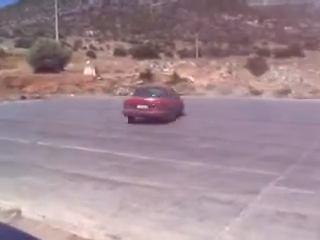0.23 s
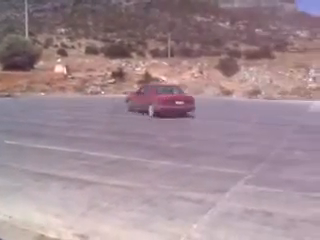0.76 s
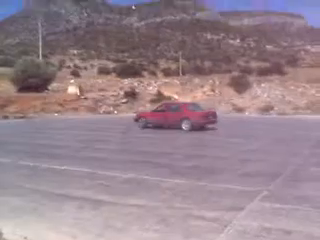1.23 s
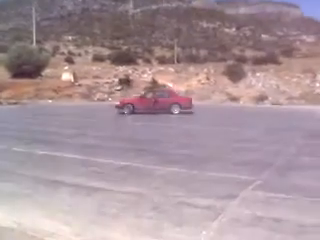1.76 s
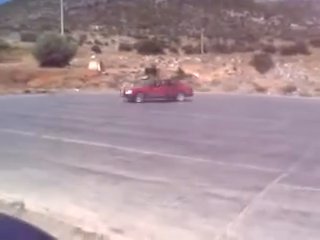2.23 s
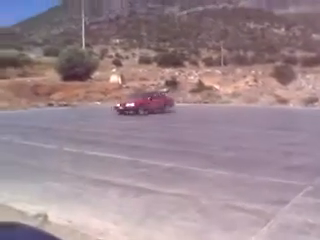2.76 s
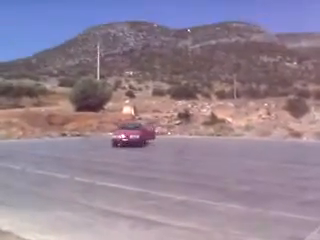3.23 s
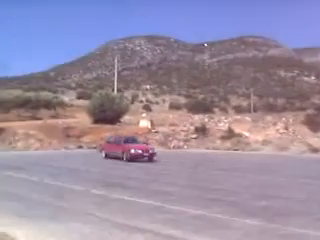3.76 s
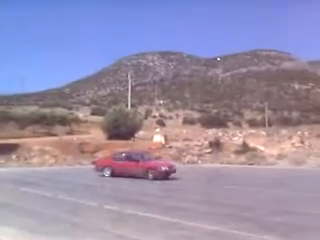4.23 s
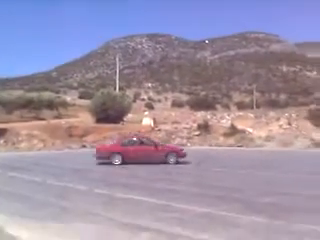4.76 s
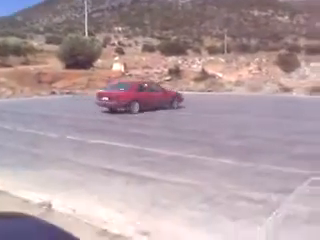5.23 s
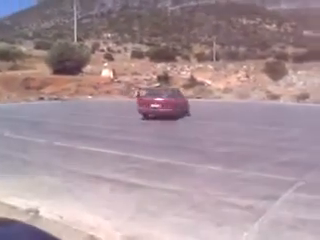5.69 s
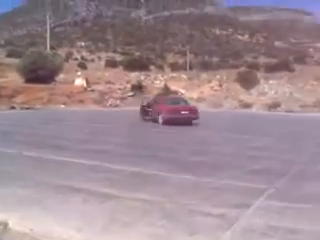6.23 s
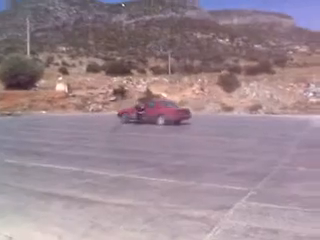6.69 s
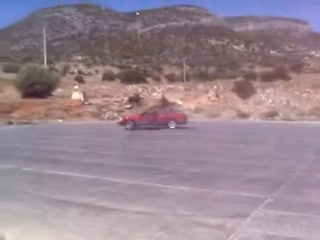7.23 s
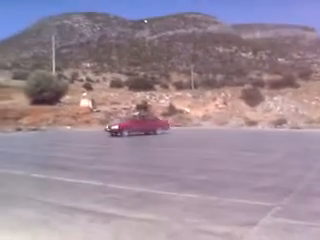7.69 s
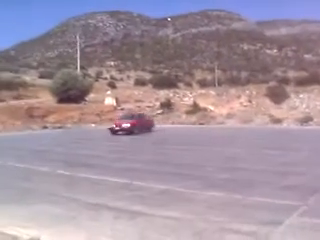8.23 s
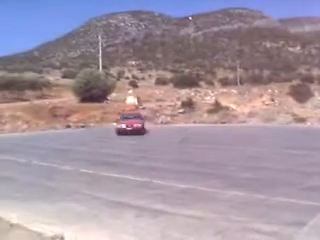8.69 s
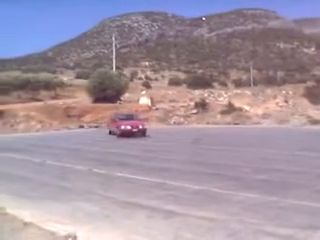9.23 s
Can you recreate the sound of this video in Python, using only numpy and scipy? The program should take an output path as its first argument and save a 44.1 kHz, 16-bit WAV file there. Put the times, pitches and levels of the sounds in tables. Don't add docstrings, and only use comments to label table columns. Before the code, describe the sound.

Stuttering mid-pitched tyre squeals from a circling car, faint low engine drone behind, with rough wind thumps overloading a muffled small camera microphone.

```python
import sys
import numpy as np
from scipy import signal
from scipy.fft import rfft, irfft, next_fast_len
from scipy.io import wavfile
from scipy.ndimage import uniform_filter1d

SR = 44100
rng = np.random.default_rng(int(sys.argv[2]) if len(sys.argv) > 2 else 0)


def to_wav(s):
    ch = np.atleast_2d(s).T
    pcm = np.round(np.clip(ch, -1, 1) * 32767)
    wavfile.write(sys.argv[1], SR, pcm.astype(np.int16))


def magnitude_from_level(level_db):
    exponent = np.asarray(level_db, float) / 20
    return 10 ** exponent


N = 417186

# start_s, slip_pitch_hz, scrub_between_spells_db,
# wind_between_gusts_db, wind_sharpness_db
SLOW = [(0, 1398, -22, -40, 6), (0.8, 1396, -27, -26, -2), (1.27, 1372, -32.5, -33, 3.5),
        (1.45, 1371, -34.5, -26, 0), (2.2, 1346, -26.5, -27.5, -4), (3, 1383, -26, -26.5, 0),
        (3.6, 1374, -19.5, -27.5, -3), (4.2, 1433, -22.5, -32, 3), (5, 1500, -30.5, -27.5, 2.5),
        (5.7, 1587, -33.5, -28, 7), (6.4, 1580, -29, -28, 2), (7, 1521, -22, -26.5, -1),
        (7.7, 1341, -28, -39.5, -0.5), (8.2, 1370, -20, -28.5, 1.5), (8.9, 1428, -19.5, -23, 0.5),
        (9.46, 1387, -24, -25.5, 1)]


def evened(x):
    return x / np.sqrt(np.mean(x ** 2) + 1e-20)


def curve(rows, column):
    rows = np.array(rows)
    return np.interp(np.arange(N) / SR, rows[:, 0], rows[:, column])


def colour(x, points):
    size = next_fast_len(N)
    hz, db = np.transpose(points)
    bins_hz = np.fft.rfftfreq(size, 1 / SR)
    shape_db = np.interp(np.log(bins_hz + 1), np.log(hz + 1), db)
    return evened(irfft(rfft(x, size) * magnitude_from_level(shape_db), size)[:N])


def wander(hz):
    knots = rng.standard_normal(N // 20 + 2)
    smooth = signal.lfilter(*signal.butter(2, min(hz * 40 / SR, .99)), knots)
    return evened(np.interp(np.arange(N) / 20, np.arange(len(knots)), smooth))


def humps(rows, column, sharp):
    out = np.zeros(N)
    for row in rows:
        start, length = row[0] * SR, row[1] * SR / 1000
        at = np.arange(max(int(start - length), 0), min(int(start + 2 * length), N))
        from_middle = abs((at - start - length / 2) / (0.52 * length))
        out[at] += magnitude_from_level(row[column]) * np.exp(-from_middle ** sharp)
    return out


def slips():
    # first_s, last_s, period_s, scrub_level_db, overtone_level_db
    runs = [
        (0.023, 0.473, .147, -30, -31),
        (0.779, 1.076, 0.13, -37, -36.5),
        (1.514, 2.455, .158, -34.5, -30),
        (2.94, 3.283, 0.17, -25.5, -34),
        (4.772, 5.5, 0.16, -30.5, -36.5),
        (5.757, 7.02, .14, -27, -34),
    ]
    # start_s, length_ms, scrub_level_db, overtone_level_db
    singles = [(.239, 52, -36, -41.5), (.708, 36, -34.5, -33), (1.17, 76, -30.5, -30),
               (1.402, 46, -39.5, -30.5), (1.664, 88, -26, -30), (2.84, 54, -41, -33.5),
               (3.543, 36, -20.5, -33.5), (3.692, 62, -32.5, -63), (3.931, 60, -34.5, -42),
               (5.24, 85, -25.5, -31.5), (5.657, 60, -36, -36), (6.39, 34, -24.5, -33),
               (6.494, 62, -23.5, -29), (7.202, 29, -31.5, -35), (7.304, 140, -28.5, -34),
               (7.524, 110, -34.5, -37.5), (7.732, 64, -35, -36.5), (8.113, 140, -32.5, -31.5),
               (8.421, 150, -27.5, -41.5), (8.317, 49, -32, -52), (8.605, 100, -20, -35.5),
               (8.775, 180, -44.5, -39.5), (9.031, 36, -41, -39), (9.317, 56, -34.5, -31)]
    slip_share = 0.77
    hops = []
    for first, last, period, *levels_db in runs:
        for s in np.linspace(first, last, round((last - first) / period) + 1):
            hops.append((s, 1000 * slip_share * period, *levels_db))
    return np.vstack([np.array(hops), singles])


def rubber(hz, jitter):
    shaky_hz = hz * (1 + jitter * wander(147))
    return np.sqrt(2) * np.exp(2j * np.pi * np.cumsum(shaky_hz) / SR)


def scrub():
    wide = 1 + np.interp(np.arange(N) / SR, (5.5, 6.9), [0, .5])
    outer = [(curve(SLOW, 1) * ratio ** wide, db) for ratio, db in [(.92, -5), (1, 0), (1.07, -7)]]
    inner = [(1600, -13), (1760, -9)]  # hz, level_db
    out = np.zeros(N, complex)
    for hz, db in outer + inner:
        grip_db = 4.5 * wander(40)
        pitch_hz = hz * (1 + .03 * wide * wander(18))
        out += magnitude_from_level(db + grip_db) * rubber(pitch_hz, .021 * wide ** 2)
    level = humps(slips(), column=2, sharp=1.7) + magnitude_from_level(curve(SLOW, 2) - 7.0)
    return level * out / np.std(out.real)


def chirps():
    # middle_s, pitch_hz, level_db
    outer = [(.204, 1384, -25.5), (.229, 1310, -19.5), (.258, 1424, -16.5), (.383, 1324, -15),
             (.538, 1327, -17), (.731, 1358, -17.5), (2.211, 1302, -20), (2.533, 1266, -17.5),
             (2.559, 1338, -23.5), (3.228, 1373, -18), (3.365, 1392, -21.5), (3.462, 1216, -16),
             (3.476, 1298, -16), (3.574, 1419, -21.5), (3.687, 1314, -20.5), (3.744, 1271, -19.5),
             (3.82, 1424, -19), (3.977, 1486, -22), (4.051, 1518, -21.5), (5.96, 1546, -13.5),
             (6.046, 1683, -20), (6.09, 1626, -21.5), (6.113, 1611, -18), (7.758, 1293, -24),
             (8.188, 1356, -19.5), (8.275, 1300, -18), (8.487, 1298, -17), (8.511, 1360, -21),
             (8.555, 1292, -18), (9.173, 1398, -21.5)]
    # middle_s, pitch_hz, level_db
    inner = [(.271, 1797, -19), (0.291, 2110, -20), (.32, 1690, -18.5), (.408, 1690, -19),
             (.424, 1750, -16.5), (0.479, 1706, -26), (.51, 1700, -26), (.58, 1651, -19),
             (0.725, 1685, -21.5), (2.406, 1702, -24.5), (3.103, 2100, -25.5), (3.112, 1664, -17.5),
             (3.372, 1775, -23), (3.52, 1150, -23.5), (3.569, 1722, -18), (5.996, 2020, -27),
             (6.411, 1681, -27), (6.476, 1713, -25.5), (8.654, 1595, -21), (8.698, 1597, -25)]
    t, out = np.arange(N) / SR, np.zeros(N, complex)
    for block in range(3):
        middle, hz, db = np.transpose(sorted(outer + inner)[block::3])
        ms = 21 * magnitude_from_level(-.35 * (db + 20))
        start = middle - ms / 2000
        edges = np.ravel([start, start + ms / 1000], "F")
        pitch_hz = np.interp(t, edges, np.repeat(hz, 2)) * (1 + .015 * wander(30))
        rows = np.transpose([start, ms, hz, db])
        flutter = magnitude_from_level(2.1 + 2.2 * wander(120))
        out += humps(rows, column=3, sharp=4) * flutter * rubber(pitch_hz, .016)
    return out


def tyres():
    # hz, level_db
    reach = [(1900, -33), (2580, 0), (3300, -5), (4300, -28)]
    # start_s, pitch_hz, level_db
    paired = [(0, 682.4, -36), (.6, 688.7, -43), (1.9, 665, -42.5), (2.7, 654.6, -42), (3.2, 728, -42),
              (3.7, 723.4, -34), (4.4, 706, -49.5), (9.46, 710, -68.5)]
    squeal = chirps() + scrub()
    size = uniform_filter1d(abs(squeal), 500) + 1e-4
    squared = (squeal ** 2 * np.exp(.35j * wander(300))).real
    overtone = colour(squared / size ** 1.7, reach)
    overtone_level = humps(slips(), column=3, sharp=40) + magnitude_from_level(curve(SLOW, 2) - 20.5)
    half_hz = curve(paired, 1) * (1 + .008 * wander(3))
    half_rate = magnitude_from_level(curve(paired, 2) + 3 * wander(12)) * rubber(half_hz, .008)
    return squeal.real + overtone_level * overtone + half_rate.real


def engine():
    # start_s, firing_hz, level_db
    revs = [
        (0, 189, -43),
        (.8, 198.5, -28.5),
        (1.5, 187.8, -38.5),
        (5.5, 194, -42),
        (6.4, 204.8, -39),
        (7.3, 210.4, -35.5),
    ]
    # multiple_of_firing, level_db
    orders = [(1, -6), (2, -20)]
    firing_hz = curve(revs, 1) * (1 + .004 * wander(6.3) + .03 * wander(40))
    turn = 2 * np.pi * np.cumsum(firing_hz) / SR
    drone = sum(magnitude_from_level(db + 3 * wander(12)) * np.sin(k * turn) for k, db in orders)
    return np.sqrt(2) * magnitude_from_level(curve(revs, 2)) * drone


def rolling():
    # hz, level_db
    hiss = [(35, -69), (60, -39), (289, -7.5), (1050, -32), (1270, -10.5), (1390, -20.5), (1570, -10),
            (2190, 2.5), (2620, 1.5), (3000, -13.5), (4070, -20), (5290, -69.5), (8950, -120)]
    return magnitude_from_level(-43 + 4 * wander(13)) * colour(rng.standard_normal(N), hiss)


def wind():
    # start_s, length_ms, level_db
    gusts = [(.009, 106, -17), (.49, 140, -20), (.731, 447, -16.5), (1.165, 202, -17.5), (1.522, 104, -21),
             (1.759, 215, -18), (2.152, 123, -20.5), (2.3, 210, -21.5), (2.533, 171, -17.5),
             (2.839, 125, -18), (3.355, 63, -28), (3.531, 140, -19.5), (3.76, 620, -17),
             (4.365, 182, -19.5), (4.555, 160, -18), (4.726, 327, -18), (5.257, 330, -17),
             (5.812, 122, -17.5), (5.979, 89, -17.5), (6.138, 74, -17), (6.55, 233, -17), (6.9, 247, -19),
             (7.34, 181, -17), (7.558, 56.6, -13), (7.791, 74, -15), (7.887, 87, -16.5),
             (8.649, 110, -17.5), (8.865, 81, -20.5), (9.003, 110, -15.5), (9.162, 116, -15.5)]
    # peak_s, level_db
    buffets = [(0.083, -21.5), (.81, -7), (0.996, -10.5), (1.088, -12), (.926, -29), (1.836, -10.5),
               (2.075, -7.5), (2.311, -14.5), (2.346, -12.5), (2.626, -14.5), (2.775, -12), (3.041, -9.5),
               (3.185, -11), (3.407, -12.5), (3.714, -12), (4.134, -11), (4.202, -7), (4.408, -13.5),
               (5.162, -14.5), (5.699, -10), (4.913, -11.5), (7.048, -13), (7.18, -10), (8.226, -7.5),
               (8.34, -12.5), (8.592, -18), (8.801, -10.5), (9.119, -11), (9.389, -15), (9.448, -13.5)]
    # hz, level_db
    rumble = [(15, -55.5), (25, -32), (102, -21.5), (302, 8), (538, 4), (1020, -4), (1180, -8),
              (1460, -6.5), (2390, -18), (3150, -23.5), (4070, -49.5), (5290, -71.5), (8950, -120)]
    t = np.arange(0, N + 40, 40) / SR
    hits = np.zeros(len(t))
    for s, db in buffets:
        rise_or_fall_ms = np.where(t < s, 10.8, 12.5)
        hits += magnitude_from_level(2 * db) * np.exp(-1.38 * ((t - s) * 1000 / rise_or_fall_ms) ** 2)
    hits = np.interp(np.arange(N) / SR, t, hits) * magnitude_from_level(-4.5)
    spells = humps(gusts, column=2, sharp=13) * magnitude_from_level(3 * wander(27) - 1.0)
    gust = np.sqrt(hits + spells ** 2 + magnitude_from_level(2 * curve(SLOW, 3)))

    eddies = magnitude_from_level(4.46 * wander(90))
    body = colour(rng.standard_normal(N) * eddies, rumble)
    body = evened(body / uniform_filter1d(body ** 2, 600) ** .35)
    upper = signal.lfilter(*signal.butter(2, 730 * 2 / SR, "high"), body)
    sharpness = magnitude_from_level(curve(SLOW, 4)) * (gust / 0.08) ** 0.2
    return gust * (body + (sharpness - 1) * upper)


def scene():
    # start_s, length_ms, share_lost_db
    lulls = [(.135, 46, -5.5), (1.14, 36, -3.5), (1.385, 31, -4.5), (1.45, 18.5, -3), (1.81, 18, -8.5),
             (2.605, 13, -5), (2.715, 27, -4.5), (4.31, 48, -6.5), (4.45, 14, -7), (4.69, 18, -8),
             (4.765, 23, -7), (4.86, 12, -2), (5.06, 10, -2), (5.635, 15.1, 0.5), (5.94, 27, -3.5),
             (6.6, 25, -5.5), (6.705, 14, -2.5), (7.125, 25, -2), (7.86, 11, -4.5), (8.0, 180, -10),
             (8.285, 22, -3), (9.09, 23, -1.5), (9.145, 19, -7), (9.29, 62, -3.5)]
    car = tyres() + engine() + rolling()
    lull = 1 - humps(lulls, column=2, sharp=20.0)
    return (car * abs(lull) ** 0.41 + wind() * lull)[None]


def add(x, s, shape, hush_s):
    near = x[round(s * SR) - len(shape) // 2:][:len(shape)]
    from_middle_s = (np.arange(len(shape)) - len(shape) // 2) / SR
    near *= 1 - np.exp(-(from_middle_s / hush_s) ** 2)
    near += shape


def converter(x, edge_hz):
    # peak_s, signed_size
    cracks = [(.7921, -1.15), (.7956, -1.35), (1.7251, -1.13), (4.0695, 1.27), (4.1876, -1.35),
              (4.1993, -1.2), (4.2037, 1.35), (7.0767, -.95), (8.7335, -1.3)]
    # peak_s, signed_size
    slaps = [(.984, .712), (2.8566, .72), (3.5721, -.86), (7.181, .715)]
    # click_s, step_size
    small_click = (1.08, .2)
    ceiling = .705
    t = np.arange(-200, 201) / SR
    spike = np.sinc(2 * edge_hz * t) * np.hanning(len(t)) ** 4
    flip = spike - .3 * np.exp(-((t - .00012) / .0005) ** 2)
    for s, size in cracks:
        add(x, s, size * flip, .0006)
    slap = np.exp(-(t / .0009) ** 2) * np.cos(2 * np.pi * 900 * t)
    for s, size in slaps:
        add(x, s, size * slap, .0009)
    x = np.clip(x, -ceiling, ceiling)
    jump = np.sign(t) * np.exp(-abs(t) / .0005) / 2
    add(x, small_click[0], small_click[1] * jump, .0003)
    return x


def low_pass(x):
    return signal.sosfilt(signal.butter(12, 15900, fs=SR, output="sos"), x)


def record(dry):
    edge_hz = 4230
    x = dry[0] / (1 + (dry[0] / .59) ** 6) ** (1 / 6)
    loudness = np.sqrt(abs(uniform_filter1d(x ** 2, 350)))
    x += magnitude_from_level(-23) * loudness * rng.standard_normal(N)
    x = signal.oaconvolve(x, signal.firwin(255, edge_hz, window=("kaiser", 9), fs=SR), "same")
    x = converter(x, edge_hz)
    return low_pass(x[None])


dry = scene()
out = record(dry)
to_wav(out)
```